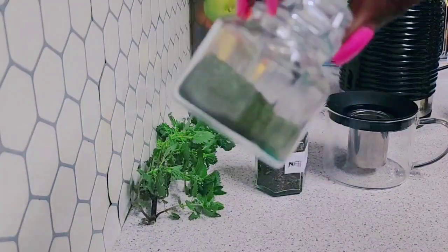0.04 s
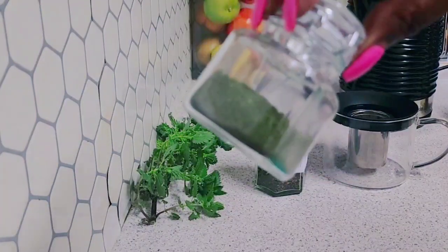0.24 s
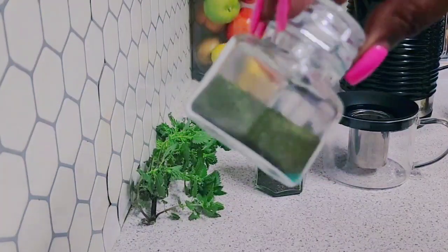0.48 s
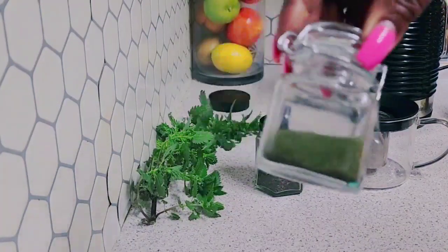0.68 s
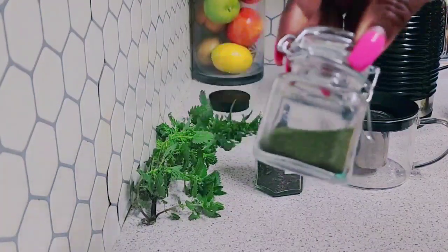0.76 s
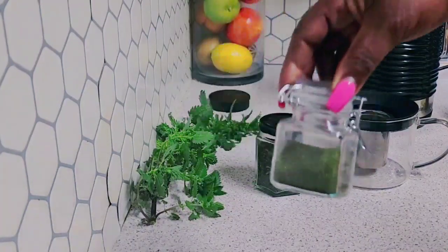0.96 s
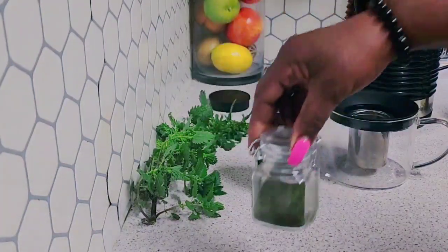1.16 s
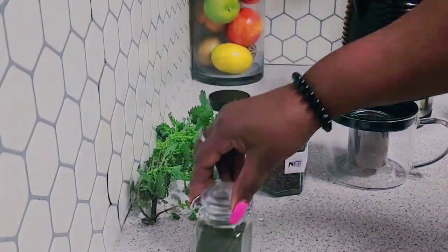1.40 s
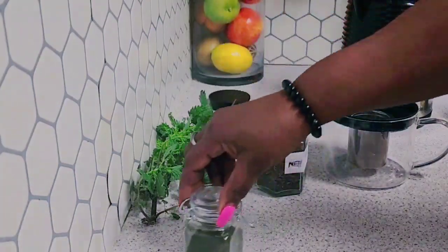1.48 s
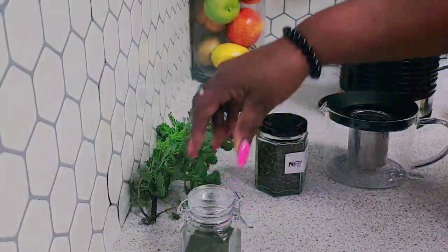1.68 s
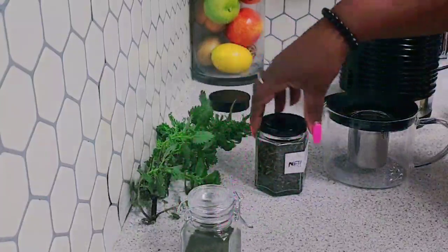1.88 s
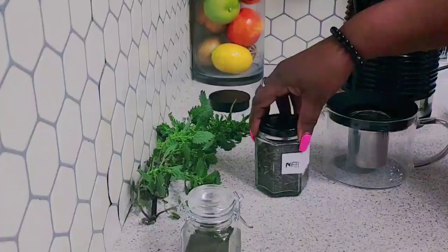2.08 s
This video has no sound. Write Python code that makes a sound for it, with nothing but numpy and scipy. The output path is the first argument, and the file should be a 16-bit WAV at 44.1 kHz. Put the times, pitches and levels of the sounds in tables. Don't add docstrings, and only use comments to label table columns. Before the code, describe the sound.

A small glass jar is set on a kitchen counter with one sharp knock and bright wire clasp ticks, after soft dull bumps and faint rustling; close stereo phone microphone, quiet room with low rumble and hiss.

```python
import sys
import numpy as np
from scipy import signal
from scipy.fft import rfft, irfft
from scipy.io import wavfile

SR = 44100
rng = np.random.default_rng(int(sys.argv[2]) if len(sys.argv) > 2 else 0)


def linear_from_db(decibels):
    return 10 ** (np.asarray(decibels, float) / 20)


def to_wav(s):
    ch = np.atleast_2d(s).T
    pcm = np.round(np.clip(ch, -1, 1) * 32767)
    wavfile.write(sys.argv[1], SR, pcm.astype(np.int16))


N = 94682
T = np.arange(N) / SR
HZ = np.maximum(np.fft.rfftfreq(N, 1 / SR), 1)
LEFT_RIGHT = np.array([[1], [-1]])


def level(x, db):
    return x * linear_from_db(db) / np.sqrt(np.mean(x ** 2))


def line(table, at, log=False):
    x, y = np.array(table).T[:2]
    return np.interp(np.log(at), np.log(x), y) if log else np.interp(at, x, y)


def shaped(x, gain):
    return irfft(rfft(x, N) * gain, N)


def stereo_noise(alike_hz):
    mid, side = rng.standard_normal((2, N))
    side = shaped(side, HZ / np.hypot(HZ, alike_hz))
    return np.array([mid + side, mid - side]) / np.sqrt(2)


def decay(start, t60):
    return (T >= start) * linear_from_db(-60 * np.maximum(T - start, 0) / t60)


def build_up(start, ms):
    return 1 - np.exp(-np.maximum(T - start, 0) * 1000 / ms)


def contact_pushes():
    # (time [s], level [dB], push length [ms])
    contacts = [
        (1.7070, 0, 0.33),
        (1.7090, -8, 0.98),
        (1.7112, 4.5, 0.61),
        (1.7128, -6, 0.37),
        (1.7179, -5, 0.91),
        (1.7363, -11, 1.165),
        (1.7392, -9, 1.2),
    ]
    pushes = []
    for start, db, ms in contacts:
        phase = np.clip((T - start) / (ms / 1000), 0, 1)
        pushes.append(-linear_from_db(db) * np.sin(np.pi * phase) ** 2)
    return pushes


def body_ringing(port_spread_hz):
    mode_hz = [124, 208, 244, 401, 470, 511, 640, 715, 822, 950, 1547, 1765, 1934, 3280]
    # (level [dB], 60 dB decay time [s])
    modes = [(-16.5, 0.36), (-10.5, 0.24), (-4.5, 0.22), (1.5, 0.14), (-6, 0.18), (-5.5, 0.16), (-7, 0.18),
             (-6, 0.13), (-4, .15), (0, 0.11), (-5, .11), (-4, 0.18), (-3, 0.11), (-5, .08)]
    ringing = 0
    for k, (hz, (db, t60)) in enumerate(zip(mode_hz, modes)):
        port_phase = (-1) ** k * np.arctan(hz / port_spread_hz) * LEFT_RIGHT
        ringing = ringing + linear_from_db(db) * decay(0, t60) * np.sin(2 * np.pi * hz * T + port_phase)
    return ringing * build_up(0, ms=0.23)


def room_tail(port_spread_hz):
    # (centre [Hz], level [dB], 60 dB decay time [s])
    bands = [(70, -32.5, .35), (120, -24, .4), (229.7, -15.5, 0.17), (450, -6.5, 0.11), (1100, -12, .13),
             (2200, 0, 0.074), (3300, -5.5, 0.1), (4200, -21, .25)]
    late_db, late_t60_s = -26, 0.45
    noise, tail = stereo_noise(port_spread_hz), 0
    centres = [row[0] for row in bands]
    corners = [centres[0] / 2] + centres + [centres[-1] * 1.4]
    for k, (hz, db, t60) in enumerate(bands):
        share = np.interp(np.log(HZ), np.log(corners), np.eye(len(corners))[k + 1])
        fade = decay(0, t60) + linear_from_db(late_db) * decay(0, late_t60_s)
        tail = tail + level(shaped(noise, share), db) * fade
    return linear_from_db(-18) * tail * build_up(0, ms=2)


def knock():
    body_db, direct_db, port_lag_ms = -11.5, 1.5, 0.072
    port_spread_hz = 850
    pushes = contact_pushes()
    body = body_ringing(port_spread_hz)
    tail = room_tail(port_spread_hz)
    lag = np.exp(-2j * np.pi * HZ * port_lag_ms / 1000 * np.array([[1], [0]]))
    direct = linear_from_db(direct_db) * HZ / (HZ - 600j) * lag
    per_push = 8000 / SR
    landing = shaped(pushes[0], rfft(body) * per_push * linear_from_db(body_db))
    return landing + shaped(sum(pushes), rfft(tail) * per_push + direct)


def clasp():
    # (time [s], level [dB], 60 dB decay time [s], low edge [Hz], high edge [Hz])
    ticks = [
        (1.7065, -31, 0.11, 4450, 18300),
        (1.7180, -52.5, 0.42, 4400, 18200),
        (1.7730, -40.5, .03, 5000, 18120),
        (1.834, -55, 0.36, 3360, 4300),
        (1.843, -61.5, 0.053, 4940, 9000),
        (1.8780, -63.5, 0.026, 4480, 18000),
    ]
    # (frequency [Hz], level [dB per Hz])
    wire_colour = [(1760, -35.5), (3000, -5), (4120, -7.5), (4380, -15), (9190, -14.5), (14300, -21),
                   (15500, -23)]
    fizz = shaped(stereo_noise(2000), linear_from_db(line(wire_colour, HZ, log=True)) * (HZ > 2500))
    out = 0
    for start, db, t60, low_hz, high_hz in ticks:
        band = 1 / np.sqrt((1 + (low_hz / HZ) ** 8) * (1 + (HZ / high_hz) ** 8))
        out = out + level(shaped(fizz, band), db) * decay(start, t60) * build_up(start, ms=0.66)
    return out


def faint_swell():
    # (time [s], level [dB])
    swell_path = [
        (1.66, -75),
        (1.68, -63),
        (1.695, -52.5),
        (1.705, -44.5),
        (1.712, -87.5),
    ]
    # (centre [Hz], width [Hz], level [dB])
    swell_bands = [(400, 810, -1), (930, 460, 1.5), (1500, 800, 2.5), (3220, 600, -14)]
    ringing = 0
    for k, (hz, width, db) in enumerate(swell_bands):
        ringing = ringing + (-1) ** k * linear_from_db(db) / (1 + 1j * (HZ / hz - hz / HZ) * hz / width)
    swelling = (T > swell_path[0][0]) * (T < swell_path[-1][0])
    return level(shaped(stereo_noise(1300), ringing), 0) * linear_from_db(line(swell_path, T)) * swelling


def arm_bumps():
    # (time [s], level [dB], frequency [Hz], 60 dB decay time [s])
    bumps = [(0.971, -41.5, 88.7, 0.19), (.985, -47.5, 281, 0.16), (.987, -64, 510, 0.13),
             (1.014, -49.5, 220, 0.074), (1.055, -54.5, 295, 0.17), (1.099, -49.5, 170, 0.19),
             (1.10, -67, 767, 0.079), (1.127, -42.5, 81.6, 0.18), (1.179, -51.5, 270, 0.097),
             (1.178, -61, 754, 0.065), (1.179, -67, 2910, 0.071), (1.179, -45.5, 120, 0.18)]
    out = 0
    for start, db, hz, t60 in bumps:
        onset = np.clip((T - start) * hz / 0.77, 0, 1)
        out = out + linear_from_db(db) * decay(start, t60) * np.sin(2 * np.pi * hz * (T - start)) * onset
    return out * linear_from_db(1.5 * LEFT_RIGHT)


def rustle():
    # (time [s], level [dB])
    rustle_path = [(0, -66), (.1, -69.5), (.25, -76), (.97, -114), (1.0, -70.5), (1.06, -63), (1.12, -65.5),
                   (1.165, -71.5), (1.185, -58.5), (1.22, -70), (1.3, -70.5), (1.37, -75), (2.15, -75)]
    # (frequency [Hz], level [dB per Hz])
    rustle_colour = [(220, 10), (500, 1), (900, -9), (1500, -7.5), (3000, -10), (5000, -15.5),
                     (7500, -11.5), (10000, -26)]
    grains_per_s, scatter_db = 8500, 1.5
    size = linear_from_db(scatter_db * rng.exponential(size=(3, N))) * rng.standard_normal((3, N))
    clicks = size * (rng.random(N) < grains_per_s / SR)
    clicks = clicks[:2] + clicks[2]
    grainy = shaped(clicks, linear_from_db(line(rustle_colour, HZ, log=True)))
    return level(grainy, 0) * linear_from_db(line(rustle_path, T))


def room_rumble():
    # (frequency [Hz], level [dB per Hz])
    rumble_colour = [(12, -41.5), (20, -7.5), (76, -3), (148, -14.5), (214, -22.5), (303, -29),
                     (333, -26.5), (367, -37), (2000, -34.5), (2600, -73), (4400, -120)]
    swell_db = level(shaped(rng.standard_normal(N), 1 / (1 + (HZ / 4) ** 2)), 1.5)
    colour = linear_from_db(line(rumble_colour, HZ, log=True)) * (HZ > 15) * (HZ < 600)
    return level(shaped(stereo_noise(350), colour), -59) * linear_from_db(swell_db)


def microphone_hiss():
    # (frequency [Hz], level [dB per Hz])
    hiss_colour = [(600, -0.5), (1300, -5), (3000, -9.5), (8000, -14), (9700, -19), (10800, -18),
                   (14500, -16), (15700, -22.5)]
    pan_db = 2.5 / (1 + (9000 / HZ) ** 6) * LEFT_RIGHT
    colour = linear_from_db(line(hiss_colour, HZ, log=True) + pan_db) * (HZ >= 600)
    return level(shaped(rng.standard_normal((2, N)), colour), -76)


def scene():
    lean_db = -1.5 / (1 + (1500 / HZ) ** 2) / (1 + (HZ / 11000) ** 6)
    low_cut = 1 / (1 - 1j * 130 / HZ) ** 2
    jar = shaped(knock() + clasp(), linear_from_db(lean_db * LEFT_RIGHT) * low_cut)
    return jar + faint_swell() + arm_bumps() + rustle() + room_rumble() + microphone_hiss()


def low_pass(x):
    return signal.sosfilt(signal.butter(12, 15970, fs=SR, output="sos"), x)


def record(dry):
    limit, top_hz = 1.12, 15700
    rounded = limit * np.tanh(dry / limit)
    mix = shaped(rounded, 1 / (1 + (HZ / top_hz) ** 80))
    return low_pass(mix)


dry = scene()
out = record(dry)
to_wav(out)
```